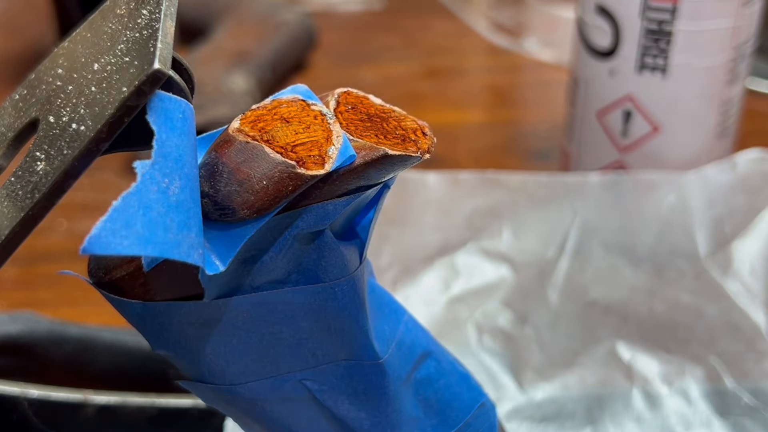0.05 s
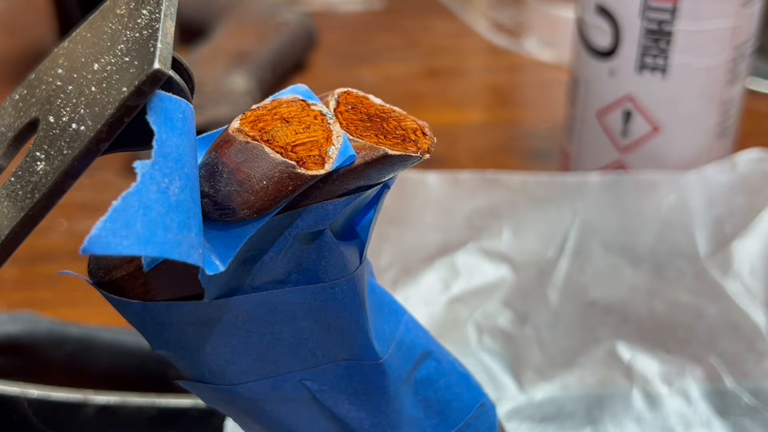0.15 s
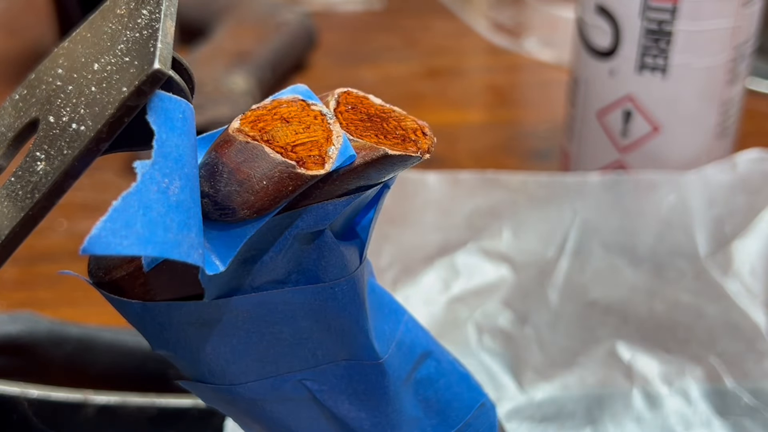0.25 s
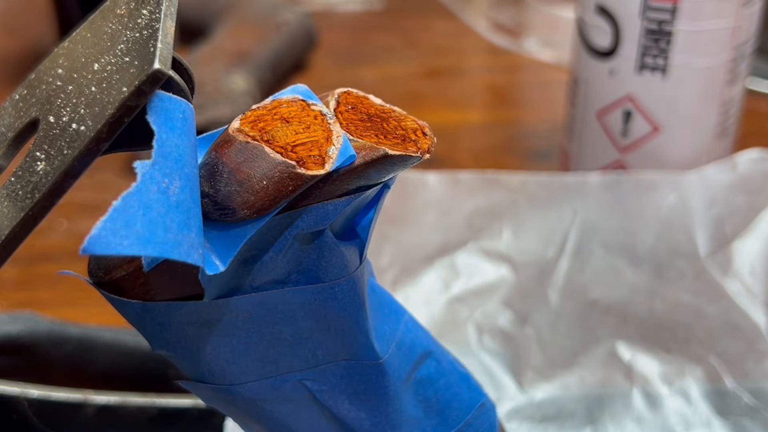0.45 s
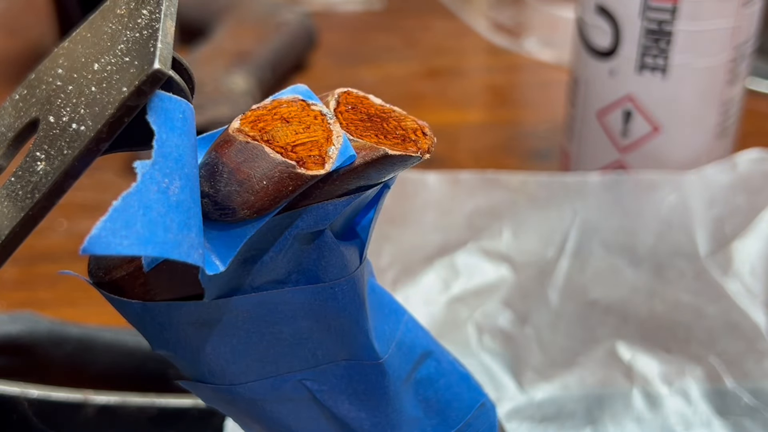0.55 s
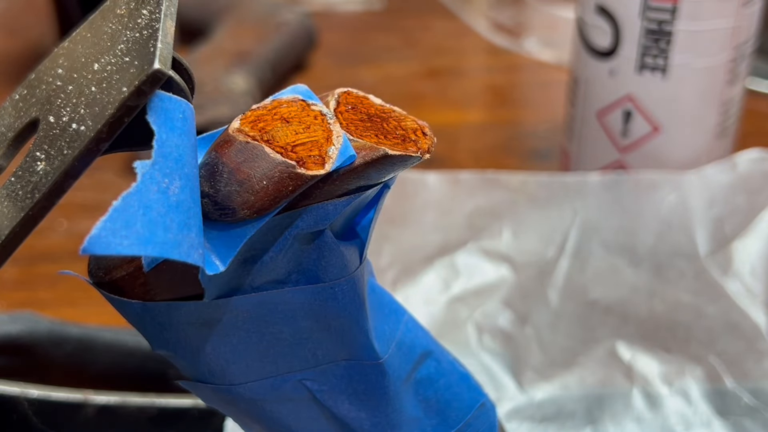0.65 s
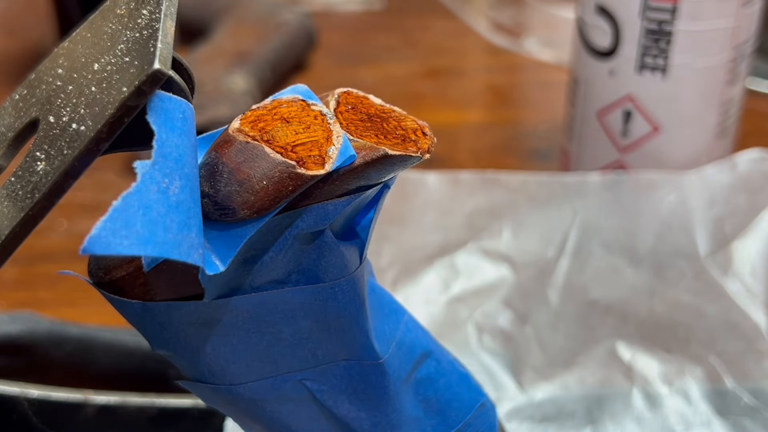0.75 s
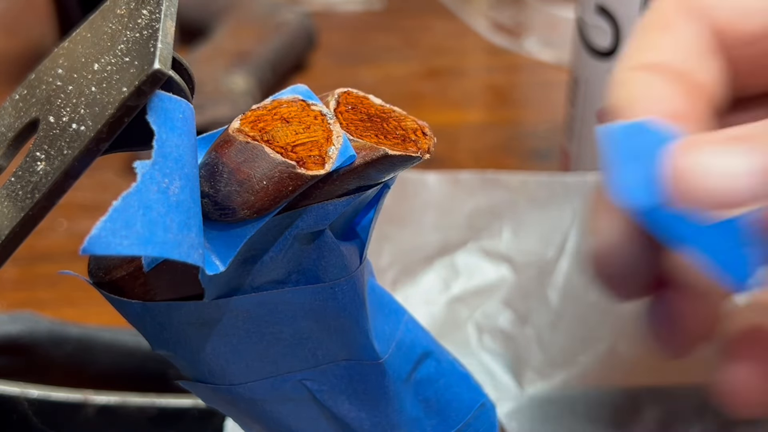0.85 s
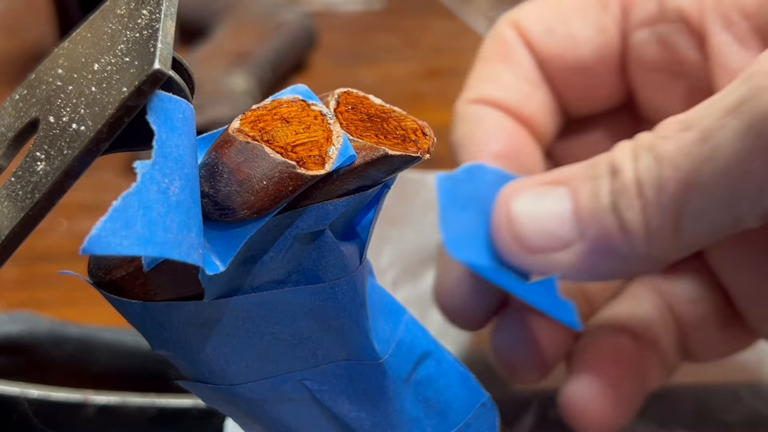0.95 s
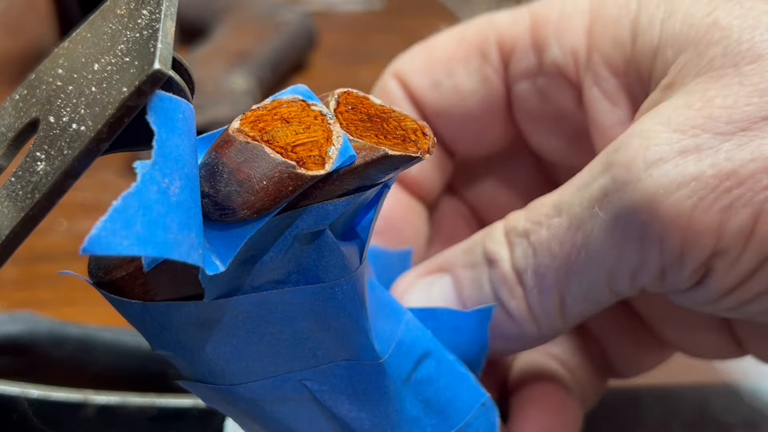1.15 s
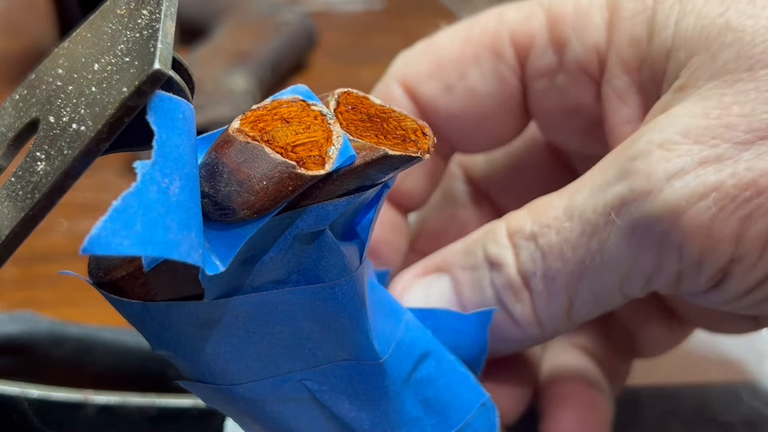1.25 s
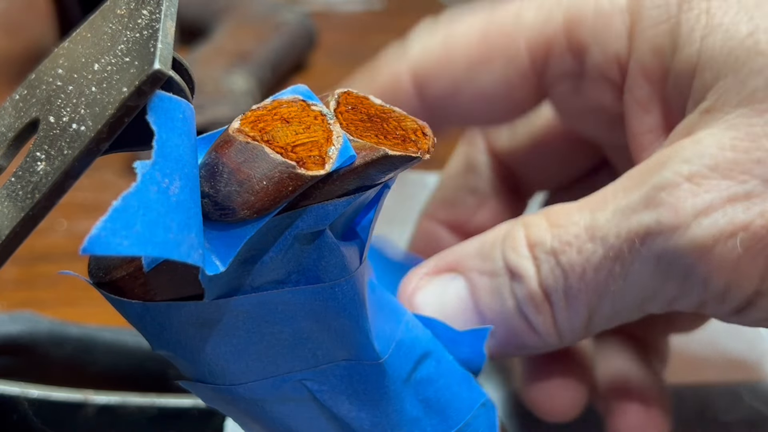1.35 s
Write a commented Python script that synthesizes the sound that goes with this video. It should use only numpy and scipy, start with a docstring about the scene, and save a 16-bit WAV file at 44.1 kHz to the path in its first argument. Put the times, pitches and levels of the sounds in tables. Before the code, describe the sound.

At about 0.2 seconds something hard knocks on a wooden workbench, rocks in a quick ringing clatter and settles by 0.4 seconds. A very faint, thin whistle follows around 0.5. From 0.6 seconds fingers press masking tape close to the microphone, much quieter, with papery rustles and bright ticks near 0.7, in a cluster around 0.9 and again near 1.4. Low room hum and soft hand bumps lie underneath.

```python
"""Something hard knocks, rocks and settles on a wooden workbench, and a small room answers.
Each impact is a short burst of noise that also sets the modes of the object and the bench top ringing.
Then fingers press masking tape round a wooden handle, close to the microphone: friction makes the
paper rustle, and its creases snap in small bright ticks. A faint, thin, wavering whistle comes and goes.
A low room hum and soft bumps of the hand lie underneath."""
import sys
import numpy as np
from scipy import signal
from scipy.fft import rfft, irfft
from scipy.io import wavfile
from scipy.ndimage import uniform_filter1d

SR = 44100
rng = np.random.default_rng(int(sys.argv[2]) if len(sys.argv) > 2 else 0)


def output_pcm(signal):
    """Save a mono or channel-first signal as 16-bit PCM at the path in sys.argv[1].

    Samples are clipped to [-1, 1] before scaling.
    """
    pcm = np.clip(np.atleast_2d(signal).T, -1, 1) * 32767
    wavfile.write(sys.argv[1], SR, np.round(pcm).astype(np.int16))


N = 61739

# blows on the bench: start_s, relative_db, decay_s, bass_db, knee_hz, crack_db, top_db, thump_db
BLOWS = [(0.1967, -24.5, 0.006, 0.5, 1254, -15, -12, -14),
         (0.1999, -29.5, 0.0028, 16.5, 1000, -16.5, -13, -15),
         (0.2144, -27.5, 0.005, 14, 1130, -12.5, -14.5, -23.5),
         (0.231, -4, 0.0033, -14.5, 1840, 0.5, -8, -7), (0.2345, -5.5, 0.0026, -1, 1810, -13, -22, 1),
         (0.2425, -21, 0.0041, 14, 1400, -14, -10.5, 4.5), (0.2494, -21.5, 0.003, 13.5, 1560, 11, -7, -1),
         (0.2756, -33.5, 0.00332, 4, 1683, 12, 20.5, -14.5), (0.2892, -15.5, 0.0047, -5, 1700, 3, 14, -2.5),
         (0.314, -16.5, 0.0025, -5, 1660, -4.5, -23, -4), (0.3206, -15.5, 0.0042, 3, 1670, 6, 6.5, -3),
         (0.3342, -13.5, 0.0019, -1.5, 1670, -13, -40, -10.5),
         (0.3377, -19.5, 0.0062, -10, 1700, -6, -33.5, -16.5),
         (0.3771, -34.5, .002, 9, 2300, 11.5, 15, -24), (0.4578, -54.5, 0.00088, 6, 2300, 10, 3, -43)]
# spectral envelope of the tape: frequency_hz, gain_db
PAPER_SPECTRUM = [(100, -15), (500, -11.5), (1000, -5.5), (1500, -7.5), (1950, -9.5), (2700, -3.5),
                  (3500, -3), (5000, 0), (6000, -3.5), (7200, 0), (8400, -4.5), (10300, -1.5), (12000, -2),
                  (14000, -1), (15800, -6)]
# stereo width of direct sound: frequency_hz, side_db
DIRECT_WIDTH = [(100, -29), (300, -22), (600, -12.5), (1200, -5.5), (2500, -9), (5000, -20), (14000, -17.5)]
# stereo width of diffuse sound: frequency_hz, side_db
DIFFUSE_WIDTH = [(100, -17.5), (300, -14), (700, -8.5), (1500, 0), (4000, -23.5), (14000, -24.5)]


def amp(db):
    """Amplitude ratio of a level in decibels."""
    return 10 ** (np.asarray(db) / 20)


def unit(x):
    """Normalisation to an rms of 1."""
    return x / np.sqrt(np.mean(x ** 2) + 1e-20)


def read(points, hz):
    """Interpolation of a table on a logarithmic frequency axis."""
    frequencies, values = np.transpose(points)
    return np.interp(np.log(hz + 1), np.log(frequencies), values)


def add(mix, start_s, sound):
    """Superposition: a sound joins the stereo mix at its start time."""
    part = mix[:, max(round(start_s * SR), 0):][:, :sound.shape[1]]
    part += sound[:, :part.shape[1]]


def colour(x, *curves):
    """Minimum-phase filtering by the sum of (frequency_hz, gain_db) curves."""
    hz = abs(np.fft.fftfreq(4096, 1 / SR))
    log_gain = np.log(amp(sum(read(curve, hz) for curve in curves)))
    response = np.exp(np.conj(signal.hilbert(log_gain)))
    taps = np.fft.ifft(response).real[:len(hz) // 2]
    return signal.fftconvolve(x, taps[None], axes=1)[:, :x.shape[1]]


def widen(pair, width):
    """Mid-side stereo: two uncorrelated signals become a partly coherent left and right."""
    side = colour(pair[1:], width)[0]
    return np.array([pair[0] + side, pair[0] - side])


def swell(t, rise_s, fall_s):
    """Envelope of exponential growth up to time zero and exponential decay after it."""
    return np.exp(np.where(t < 0, t / rise_s, -t / fall_s))


def ripple(depth_db, count=60):
    """An irregular shape has chance resonances and dips: a random gain curve for the treble."""
    hz = np.linspace(2000, 16000, count)
    deviation = np.clip(rng.standard_normal(count - 1), -2, 1.5)
    return np.transpose([hz, depth_db * np.r_[0, deviation]])


def burst(rise_s, fall_s, lead_s=.01):
    """Dense tiny impacts merge into broadband noise; returns the time to its peak and the sound."""
    t = np.arange(4096) / SR - lead_s
    envelope = swell(t, rise_s, fall_s)
    x = rng.standard_normal((2, len(t))) * envelope
    for _ in range(3):  # flatten the spectrum, then restore the envelope
        spectrum = rfft(x)
        x = irfft(spectrum / (abs(spectrum) + 1e-12))
        x *= envelope / np.sqrt(abs(uniform_filter1d(x ** 2, size=45, axis=1)) + 1e-14)
    return lead_s, widen(x / np.linalg.norm(x, axis=1, keepdims=True), DIRECT_WIDTH)


def background():
    """Steady room noise and a tonal hum, with amplitude-modulated low noise for the moving hand."""
    air_spectrum = [(25, -30), (60, -14.5), (85, -10), (110, 0), (170, -4.5), (300, -14), (500, -19),
                    (1000, -28.5), (2500, -37), (3800, -39), (4700, -30), (6000, -45), (15000, -46.5)]  # room noise: frequency_hz, relative_db
    hum_tones = [(111, -69), (170, -72.5), (239, -78.5)]  # partials of the hum: pitch_hz, level_db
    hand_spectrum = [(40, -19.5), (110, 4.5), (300, -0.5), (600, -6.5), (1200, -22.5), (4000, -36),
                     (15000, -49.5)]  # handling noise: frequency_hz, relative_db
    bumps = [(0.11, -63.5, .04, 0.022), (0.68, -59, 0.0043, 0.0075), (0.857, -60.5, 0.019, 0.012),
             (0.967, -59.5, 0.055, 0.015), (1.11, -66.5, 0.0065, 0.0077), (1.354, -68.5, 0.0247, 0.023)]  # movements of the hand: peak_s, level_db, rise_s, fall_s
    t, air_db = np.arange(N) / SR, -67.5
    air, hand = (unit(colour(widen(rng.standard_normal((2, N)), DIFFUSE_WIDTH), spectrum))
                 for spectrum in (air_spectrum, hand_spectrum))
    hum = sum(amp(db) * np.sqrt(2) * np.sin(2 * np.pi * (hz * t + rng.random())) for hz, db in hum_tones)
    motion = sum(amp(db) * swell(t - peak_s, rise_s, fall_s) for peak_s, db, rise_s, fall_s in bumps)
    return amp(air_db) * air + hum + motion * hand


def reverberation(x, echo_spectrum, build_s=.005):
    """The room's diffuse field builds up, then each band decays exponentially at its own rate."""
    decay_times = [(100, 0.26), (400, 0.2541), (1200, 0.1943), (3500, 0.2668), (8000, 0.2), (15000, 0.18)]  # reverberation time: frequency_hz, t60_s
    hz, t, bands = signal.stft(rng.standard_normal((2, SR * 3 // 4)), SR, nperseg=256)
    rate = np.log(1000) / read(decay_times, hz)[:, None]
    equal_energy = np.sqrt(2 * rate / SR)
    tail = signal.istft(bands * np.exp(-rate * t) * equal_energy, SR, nperseg=256)[1]
    tail *= 1 - np.exp(-(np.arange(tail.shape[1]) / SR / build_s) ** 2)
    response = colour(widen(tail, DIFFUSE_WIDTH), echo_spectrum)
    return signal.fftconvolve(x.mean(0)[None], response, axes=1)[:, :N]


def with_reflections(x):
    """Early reflections off the bench and the vice add delayed copies, each of random polarity."""
    bounces = [(.0029, -17), (.0047, -18.5), (.0083, -21.5)]  # reflection paths: delay_s, gain_db
    out = x.copy()
    for delay_s, db in bounces:
        add(out, delay_s, rng.choice([-1, 1]) * amp(db) * x)
    return out


def from_left(x):
    """A level difference between the channels draws the midrange slightly to the left."""
    left_lift = [(150, -0.7), (700, 0.9), (2400, 0.6), (6000, -0.5)]  # left channel: frequency_hz, gain_db
    right_shade = [(hz, -db) for hz, db in left_lift]
    return np.vstack([colour(x[:1], left_lift), colour(x[1:], right_shade)])


def whistle(level_db=-82, waver_hz=69.5):
    """A faint, thin whistle comes and goes: a gliding tone wavering by random frequency modulation."""
    glides = [(.465, .09, 4570, 4700), (0.568, 0.058, 4980, 4920)]  # glides of the whistle: start_s, length_s, from_hz, to_hz
    out = np.zeros((2, N))
    for start_s, length_s, from_hz, to_hz in glides:
        count = round(length_s * SR)
        waver = unit(uniform_filter1d(rng.standard_normal(N), size=120))[:count]
        hz = np.linspace(from_hz, to_hz, count) + waver_hz * waver
        tone = np.sqrt(2) * np.sin(2 * np.pi * np.cumsum(hz) / SR) * signal.windows.tukey(count, .5)
        add(out, start_s, amp(level_db) * tone[None])
    return out


def rubs(grains_per_s=4500, spread_db=3, hiss_gain=0.91):
    """Sliding friction: skin drags over crepe paper, giving fine random impulses and a smooth hiss."""
    strokes = [(0.0, -71, .02, 0.064, 6), (0.067, -73.5, .005, 0.019, -5), (0.585, -63.5, 0.015, 0.0041, 5),
               (0.67, -50, 0.0076, 0.0078, 17), (0.705, -70, .01, .02, 7),
               (0.931, -52, 0.008, 0.0054, -2.5), (0.909, -70, 0.05, 0.069, -7),
               (1.148, -67, 0.01, 0.023, -5), (1.24, -72.5, 0.044, 0.045, 14),
               (1.361, -59.5, .04, 0.016, 6.5)]  # finger strokes: peak_s, level_db, rise_s, fall_s, top_db
    out, t = np.zeros((2, N)), np.arange(N) / SR
    for peak_s, db, rise_s, fall_s, top_db in strokes:
        sizes = amp(spread_db * np.minimum(rng.exponential(1, N), 4))
        contacts = rng.random(N) < grains_per_s / SR
        grains = unit(sizes * contacts * rng.standard_normal((2, N)))
        friction = widen(grains + hiss_gain * rng.standard_normal((2, N)), DIRECT_WIDTH)
        tilt = [(6500, 0.0017), (12500, top_db)]
        rustle = unit(colour(friction, PAPER_SPECTRUM, ripple(depth_db=3.5), tilt))
        out += amp(db) * swell(t - peak_s, rise_s, fall_s) * rustle
    return out


def crease(hz, db, log_width=.085):
    """The damped resonance of a crease: a gain curve that is bell-shaped in log frequency."""
    offset = np.linspace(-3, 3, 17)
    return np.transpose([hz * np.exp(offset * log_width), db * np.exp(-offset ** 2)])


def snaps(gain_db=14):
    """Buckling: each crease of the tape flips and briefly excites two resonances of its own."""
    # flipping creases: peak_s, relative_db, rise_s, decay_s, body_db, top_db,
    # first_pitch_hz, first_boost_db, second_pitch_hz, second_boost_db
    flips = [(0.5615, -51.5, 0.00072, 0.0019, -7, 0, 5000, 0, 14400, 10),
             (0.5660, -51, 0.00063, 0.0011, 1, 8.5, 3750, 18, 10200, 8),
             (0.6615, -62, 0.00023, 0.00073, -24, 12, 12660, 7, 5500, 14),
             (0.6802, -36.5, 0.0026, 0.0016, -29, 10, 3350, 6.5, 5500, 3),
             (0.7793, -55.5, 0.003, 0.0093, -12.5, 5.5, 14500, 11, 4600, 2),
             (0.888, -40.5, 0.00026, 0.0025, -11, -4.5, 4980, 13.5, 10100, 8),
             (0.8929, -31, 0.00028, 0.0021, -1.5, -8, 4900, 7.5, 3700, 9.5),
             (0.9167, -45, 0.00016, 0.0023, 10.5, 2, 7500, 18.5, 4500, 1),
             (0.9350, -33, 0.0012, 0.0033, 3.5, -4.5, 5000, 8, 3900, 8.5),
             (0.9597, -43.5, 0.0006, .002, -21, -17, 4800, 3.5, 3500, 0.5),
             (1.0615, -64, .001, 0.0048, 11, 3, 2080, 23, 10470, 4),
             (1.3620, -40, 0.0014, .001, 2, 3, 4700, 8, 13600, 4.5),
             (1.3654, -32.5, 0.00096, 0.0016, -2.5, 4, 2504, 11.5, 9900, 7),
             (1.3745, -47.5, .0005, 0.00094, 2, 3, 10000, 4, 4500, 3)]
    out = np.zeros((2, N))
    for peak_s, db, rise_s, decay_s, body_db, top_db, first_hz, first_db, second_hz, second_db in flips:
        lead_s, click = burst(rise_s, decay_s)
        resonances = crease(first_hz, first_db), crease(second_hz, second_db)
        tilt = [(1800, body_db), (3300, 0), (5500, 0), (12000, top_db)]
        tick = colour(click, PAPER_SPECTRUM, *resonances, tilt, ripple(depth_db=3.5))
        add(out, peak_s - lead_s, amp(db + gain_db) * tick)
    return out


def free_vibration(modes, t):
    """A struck body vibrates as a sum of exponentially damped sinusoids."""
    return sum(amp(db - 60 * t / t60_s) * np.sin(2 * np.pi * hz * t) for hz, db, t60_s in modes)


def ringing(thump_rise_s=.006):
    """Each blow excites normal modes: the object rings and the bench top thumps."""
    bench_modes = [(109.35, -43.5, 0.24), (174.7, -30.5, .19), (421.7, -38, .09)]  # modes of the bench top: pitch_hz, relative_db, t60_s
    object_modes = [(481, -38, 0.25), (528, -38, .2), (588, -46.5, .2), (811, -47, 0.23),
                    (908, -45.5, 0.14), (990, -43, 0.29), (1355, -43.5, 0.063), (1650, -47.5, .22),
                    (2240, -42.5, .15), (3120, -44, .15), (3380, -45.5, .13), (5400, -36, 0.084),
                    (11900, -56.5, 0.099), (13800, -53, .13)]  # modes of the object: pitch_hz, relative_db, t60_s
    out, t = np.zeros((2, N)), np.arange(SR // 2) / SR
    thump = free_vibration(bench_modes, t) * (1 - np.exp(-t / thump_rise_s))
    tone = free_vibration(object_modes, t)
    for start_s, db, _, _, knee_hz, crack_db, _, thump_db in BLOWS:
        struck = colour(tone[None], [(knee_hz, db), (2 * knee_hz, db + crack_db)])
        add(out, start_s, amp(thump_db) * thump + struck)
    return out


def knocks(gain_db=17, rise_s=.0003):
    """Impact noise on wood: the harder the contact, the higher its spectral knee and the more treble."""
    body_spectrum = [(40, -36), (70, -27), (110, 0.5), (220, -5), (300, -10), (480, 1.5), (740, -6),
                     (940, 4.5), (1200, -5.5), (1355, 3.5), (1500, -3), (1700, -1.5), (1970, -9.5),
                     (2230, -4), (2580, -11.5), (2760, -6), (3150, -6.5), (3730, -3.5), (4000, -10.5),
                     (4400, -20.5), (4750, -13), (5420, -7.5), (5680, -16), (6050, -11), (7250, -21),
                     (8500, -18), (9900, -28.5), (11300, -25), (11900, -19.5), (15500, -27.5)]  # broad resonances and dips of the object: frequency_hz, gain_db
    out = np.zeros((2, N))
    for start_s, db, decay_s, bass_db, knee_hz, crack_db, top_db, _ in BLOWS:
        lead_s, impact = burst(rise_s, decay_s)
        tilt = [(350, bass_db), (950, 0), (knee_hz, 0), (2 * knee_hz, crack_db), (12000, top_db)]
        clatter = colour(impact, body_spectrum, ripple(depth_db=1.5), tilt)
        add(out, start_s - lead_s, amp(db + gain_db) * clatter)
    return out


def scene():
    """Direct and reflected sound superpose: the bench a little to the left, the tape close and central."""
    bench_echo = [(100, 1), (400, -4.5), (1200, -8), (3000, -7), (3700, -12), (4400, -5.5), (5400, -13),
                  (7000, -8.5), (14000, -1.5)]  # reverberation of the knocks: frequency_hz, gain_db
    tape_echo = [(300, -8), (2000, -13.5), (6000, -18), (14000, -22.5)]  # reverberation of the tape: frequency_hz, gain_db
    blows, tape = knocks(), snaps() + rubs()
    blows_in_room = with_reflections(blows + reverberation(blows, bench_echo))
    bench = from_left(blows_in_room + ringing())
    tape_tail = with_reflections(reverberation(tape, tape_echo))
    return bench + tape + tape_tail + background() + whistle()


def record(dry, low_hz=65, high_hz=16200):
    """Band limiting: the microphone rolls off the bass and the recorder cuts the highest treble."""
    bass_cut = signal.sosfilt(signal.butter(2, low_hz, "high", fs=SR, output="sos"), dry)
    low_pass = signal.firwin(255, high_hz, window=("kaiser", 8), fs=SR)
    return signal.oaconvolve(bass_cut, low_pass[None], "same")


dry = scene()
out = record(dry)
output_pcm(out)
```